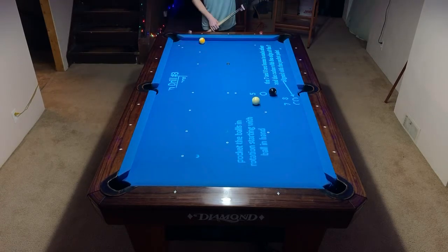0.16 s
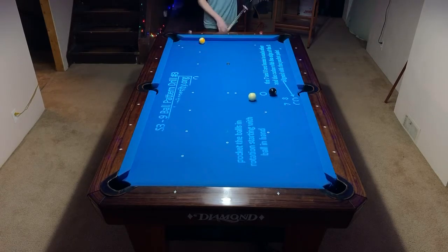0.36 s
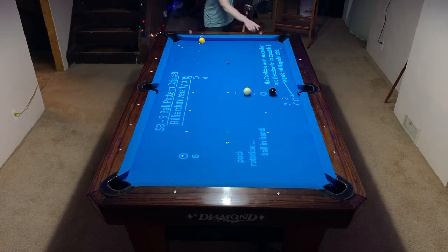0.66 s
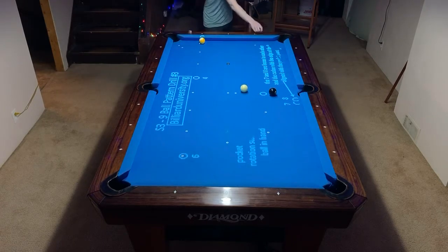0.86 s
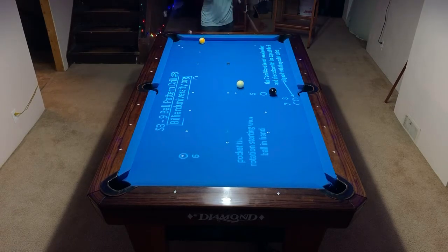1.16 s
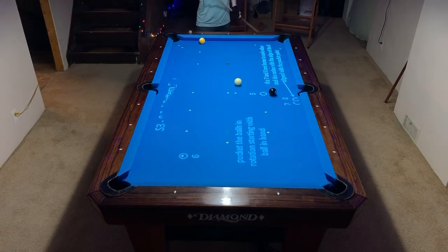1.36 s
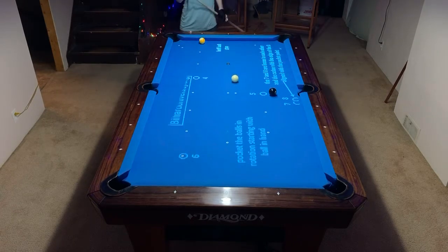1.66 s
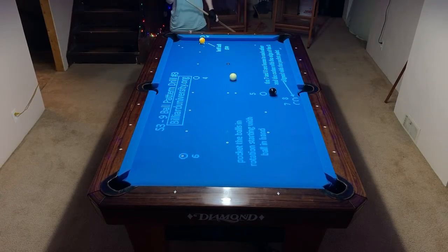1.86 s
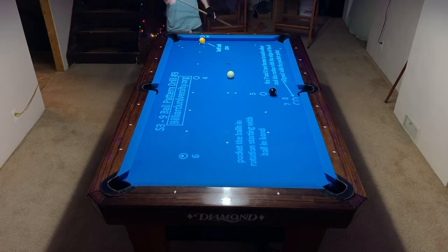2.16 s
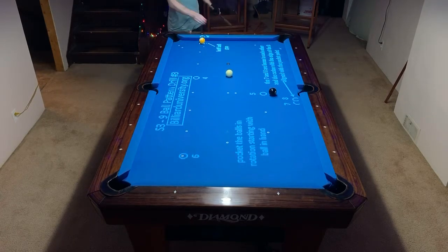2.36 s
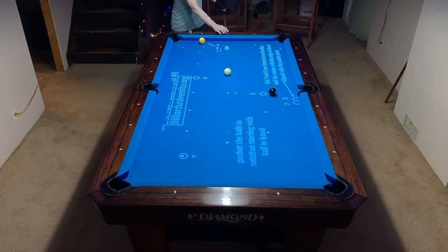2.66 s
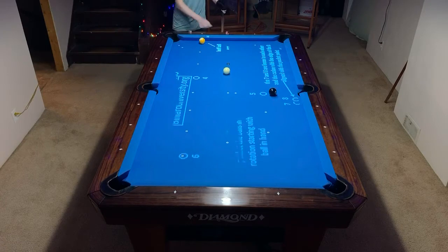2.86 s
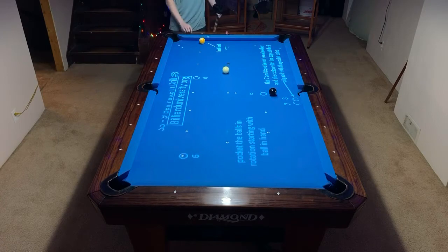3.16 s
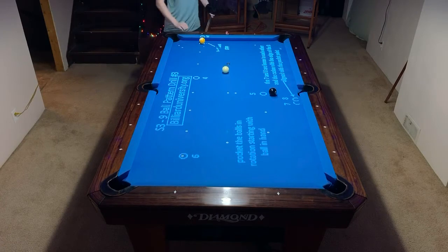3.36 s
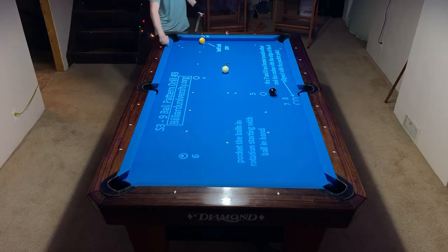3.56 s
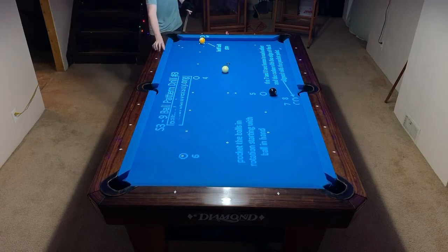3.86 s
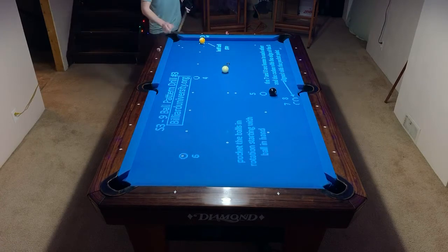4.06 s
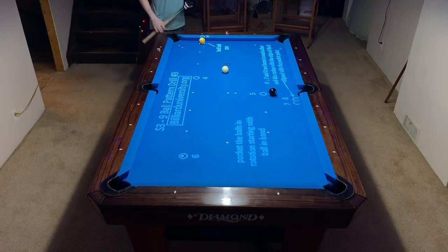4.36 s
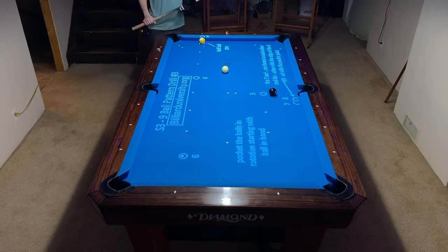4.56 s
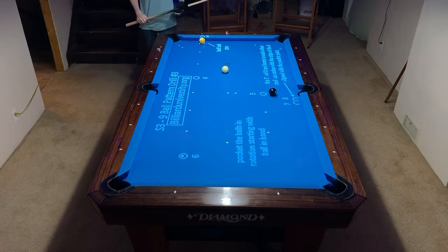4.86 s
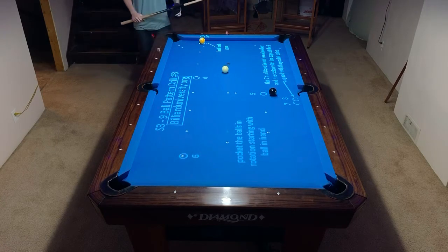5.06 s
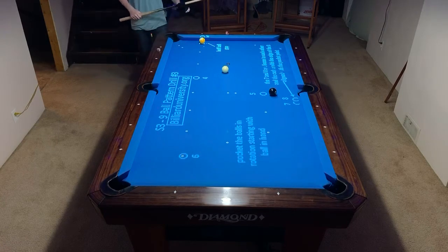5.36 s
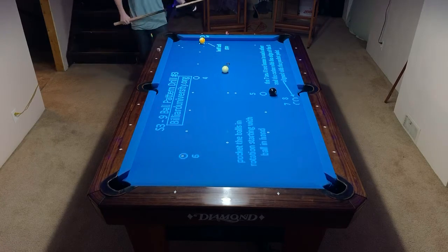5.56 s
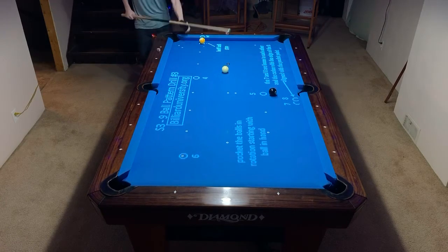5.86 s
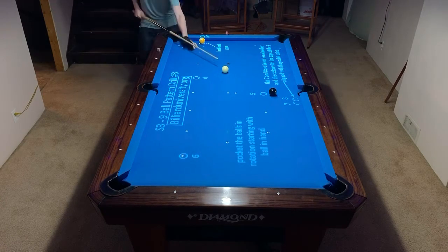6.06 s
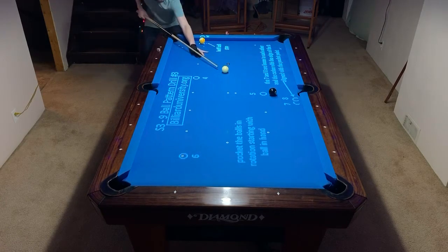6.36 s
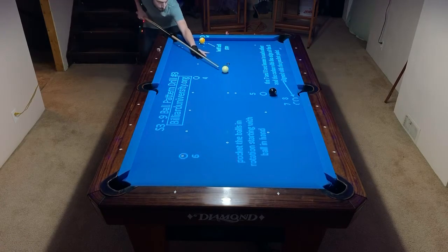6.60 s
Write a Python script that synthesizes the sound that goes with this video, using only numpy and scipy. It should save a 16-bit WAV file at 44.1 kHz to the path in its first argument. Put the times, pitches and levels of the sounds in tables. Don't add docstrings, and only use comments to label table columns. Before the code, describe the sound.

In a quiet basement, balls tumble inside a pool table: sharp clicks, boomy wooden thuds and a short rumble. Then mostly low air and faint fan hum, with light ticks, brief hissy rubbing of cloth and chalk, and isolated bumps. A strong knocking group comes past the middle, and a softer double knock near the end. Heard in stereo from the table's end, with short room reflections.

```python
import sys
import numpy as np
from scipy import signal
from scipy.fft import rfft, irfft, next_fast_len
from scipy.io import wavfile
from scipy.ndimage import uniform_filter1d

SR = 44100
rng = np.random.default_rng(int(sys.argv[2]) if len(sys.argv) > 2 else 0)


def master_out(mix):
    frames = np.transpose(np.atleast_2d(mix))
    ceiling = np.clip(frames, -1, 1)
    pcm = np.round(ceiling * 32767).astype(np.int16)
    wavfile.write(sys.argv[1], SR, pcm)


def boost(x):
    u = np.asarray(x, float) / 20
    return 10 ** u


N = 296793

# (frequency [Hz], width [Hz], level [dB])
BOOM = [(55.9, 15, -3.5), (86.1, 20.2, 0), (115.2, 15.7, 1), (138.7, 20.2, -2.5), (168, 17, -10)]
PANELS = [(185.3, 13, -7.5), (194.1, 15, -9.5), (218.55, 9.3, -2), (239, 16, -12)]
RAILS = [(245.3, 24.4, -1.5), (283.2, 20.6, 1.5), (321, 10, -7)]
# (frequency [Hz], width [Hz], level [dB])
WALLS = [(351.2, 13.6, 2.5), (400, 16.4, 0), (441.5, 35, 0.5), (488.6, 41, 0), (533, 28, 1.5),
         (619.7, 34, -2), (667, 27, -2), (777.5, 88, -5.5), (978, 25, -6.5), (1090, 22, -8.5),
         (1400, 150, -21), (1900, 53, -31.5)]
BODY = (BOOM, PANELS, RAILS, WALLS)


def evened(x):
    return x / np.sqrt(np.mean(x ** 2) + 1e-20)


def read(points, hz):
    f, value = np.transpose(points)
    return np.interp(np.log(hz + 1), np.log(f + 1), value)


def add(mix, s, sound):
    part = mix[:, max(round(s * SR), 0):][:, :sound.shape[1]]
    part += sound[:, :part.shape[1]]


def ring(x, modes):
    out = 0
    for k, (hz, width, db) in enumerate(modes):
        radius = np.exp(-np.pi * width / SR)
        turn = 2 * np.pi * hz / SR
        gain = (-1) ** k * boost(db) * (1 - radius) * np.sin(turn)
        out = out + gain * signal.lfilter([1], [1, -2 * radius * np.cos(turn), radius ** 2], x)
    return out


def steadied(x, share):
    power = abs(uniform_filter1d(x[0] ** 2, size=2200)) + 1e-20
    return evened(x / power ** (share / 2))


def air():
    # (frequency [Hz], density [dB per Hz])
    air_spectrum = [(15, -54), (28, -22), (59, -4), (129, 0), (411, -19), (599, -18), (827, -25),
                    (1050, -21.5), (1380, -28), (2700, -49.5), (5000, -59), (8000, -62), (11300, -59),
                    (15600, -71)]
    # (frequency [Hz], width [Hz], level [dB])
    fan_modes = [(1050, 30, -59.5), (504, 53, -58.5)]
    frames = N // 256 + 5
    hz = np.fft.rfftfreq(1024, 1 / SR)
    real, imaginary, patches = rng.standard_normal((frames, 513, 2, 3)).T
    patches = uniform_filter1d(patches[0], size=10, axis=0)
    patches = evened(uniform_filter1d(patches, size=14, axis=1))
    bins = (real + 1j * imaginary) * boost(read(air_spectrum, hz)[:, None] + 2.5 * patches)
    out = boost(-43) * evened(signal.istft(bins, nperseg=1024, noverlap=768)[1][:, :N])
    for f, width, db in fan_modes:
        out = out + boost(db) * evened(ring(rng.standard_normal((2, N)), [(f, width, 0)]))
    return out


def run_shape(t, start, hold, fall_db):
    rise = np.clip((t - start) / 0.014 + 1, 0, 1)
    return rise * boost(-fall_db * np.maximum(t - start - hold, 0))


def rolling():
    # (start [s], hold [s], cabinet boom level [dB],
    # panels over boom [dB], rails and walls over boom [dB])
    runs = [(0.0, 0.046, -15, -5, -11), (0.044, 0.058, -29, 13.5, -6), (.125, 0.046, -19, -2, -20),
            (0.188, 0.05, -19.5, 6, -15), (0.272, 0.066, -23.5, 6, -13.5), (.345, 0.081, -29, 10, -13.5),
            (0.621, 0.022, -41.5, -16.5, -24.5), (1.157, 0.041, -30.5, -15, -26),
            (1.24, .64, -40.5, -4.5, -5), (1.997, .06, -25.5, -2, -10.5), (2.112, .085, -29, -11.5, -29),
            (3.554, 0.12, -44.5, -3, -11), (3.817, 0.18, -33.5, -13.5, -26), (4.126, 0.15, -41, -5, 0.5),
            (4.301, 0.092, -31.5, 2, 0.5), (4.426, 0.022, -22.5, -3.5, -8.5),
            (4.471, 0.051, -27, 3.5, -7.5), (4.6, .17, -36, -18, -15.5), (4.808, 0.079, -40.5, -15, -14),
            (5.672, 0.054, -30, -16.5, -16.5), (6.179, .03, -32.5, -0.5, 7), (6.246, .03, -26.5, -0.5, -5),
            (6.303, 0.028, -31.5, -7.5, -5.5), (6.653, 0.023, -37, -1, -10)]
    # (cabinet, panels, rails, walls [dB/s])
    falls = (190, 240, 200, 250)
    # (cabinet, panels, rails, walls [dB])
    tremor = (-47.5, -52.5, -56, -60)
    # (frequency [Hz], width [Hz], level under boom [dB])
    grille = (11000, 350, -62)
    walls_under_rails_db, jolts_per_s = -4, 120
    t = np.arange(N) / SR
    jolts = boost(2.5 * np.minimum(rng.exponential(1, N), 3)) * (rng.random(N) < jolts_per_s / SR)
    unevenness = evened(uniform_filter1d(jolts, size=200))
    shake = rng.standard_normal((2, N)) * (1 + 1.2 * unevenness)

    slow = t[::32]
    power = boost(np.array(tremor))[:, None] ** 2 * np.ones(len(slow))
    for s, hold, db, panels_db, upper_db in runs:
        over_boom = np.array([0, panels_db, upper_db, upper_db + walls_under_rails_db])
        shape = run_shape(slow, s, hold, np.array(falls)[:, None])
        power += (boost(db + over_boom)[:, None] * shape) ** 2
    levels = [np.interp(t, slow, uniform_filter1d(np.sqrt(p), size=9)) for p in power]

    out = levels[0] * boost(grille[2]) * evened(ring(ring(shake, [grille]), [grille]))
    for modes, level in zip(BODY, levels):
        out += level * steadied(ring(ring(shake, modes), modes), 0.95)
    return out


def contacts():
    # (time [s], level [dB], pitch [Hz], t60 [s], ring over click [dB])
    knocks = [(.002, -19.5, 2080, 0.4, -4.5), (.851, -64.5, 5100, .11, -14), (.997, -51.5, 630, 0.21, -10),
              (1.142, -52, 1175, 0.62, -3), (1.749, -51.5, 2024, 1, -15), (1.971, -33.5, 702, 0.35, -10),
              (2.851, -69, 2500, .21, -3), (3.787, -65.5, 7050, .13, 2), (3.900, -49, 624, 0.58, -7.5),
              (4.109, -45, 802, 0.92, 2), (4.285, -29, 798, 0.41, 0.5), (4.423, -44, 1050, .99, -9),
              (4.964, -53.5, 738, .51, 0), (5.670, -47.5, 543, 0.29, 2.5), (6.171, -36, 549, 0.48, 6),
              (6.229, -38, 744, .44, 4.5), (6.632, -46.5, 1140, 0.6, -6.5)]
    # (time [s], level [dB], ring [Hz], t60 [s])
    ticks = [
        (1.380, -64, 4430, 0.46),
        (1.783, -47, 4700, 1),
        (2.579, -44, 3570, .45),
        (4.292, -52, 3820, .64),
        (4.608, -51.5, 3510, 0.42),
    ]
    # (time [s], level [dB], contact pitch
    # [Hz], board or ring [Hz], ring over click [dB])
    clacks = [
        (.003, -33, 7510, 12500, 1),
        (.006, -29.5, 1400, 1090, 6),
        (.041, -36.5, 1780, 1050, -1),
        (.135, -27.5, 2360, 1010, -5.5),
        (.137, -43, 6000, 4100, -5),
        (0.194, -29, 1495, 1900, -11.5),
        (.27, -35.5, 2010, 800, -4),
        (2.578, -36.5, 2320, 1404, 1),
        (4.471, -50, 1520, 1050, 9),
    ]
    sharp = [(s, db, hz, t60, hz, ring_db) for s, db, hz, t60, ring_db in knocks]
    sharp += [(s, db, 0.66 * hz, t60, hz, -4.5) for s, db, hz, t60 in ticks]
    sharp += [(s, db, hz, 0.47, board_hz, board_db) for s, db, hz, board_hz, board_db in clacks]
    return sorted(sharp)


def clicks():
    # (frequency [Hz], factor on t60 [1])
    room_decay = [(200, 1.3), (1000, 0.89), (3000, 0.73), (8000, 0.5)]
    out, length = np.zeros((2, N)), SR // 2
    for s, db, contact_hz, t60, mode_hz, mode_db in contacts():
        taps = rng.choice([-1., 1.], (2, length)) * (rng.random((2, length)) < 3000 / SR)
        taps[:, 128] = 1.0
        taps[:, :128] = 0
        hz, t, bins = signal.stft(taps, SR, nperseg=128)
        ratio = (hz[:, None] + 1) / contact_hz
        colour = ratio / (1 + ratio ** 2) ** 1.795 / np.sqrt(1 + (ratio / 2.64) ** 6)
        swell = 1 - 0.41 * np.exp(-t / 0.013)
        fade = swell * boost(-60 * t / (t60 * read(room_decay, hz)[:, None]))
        answer = signal.istft(bins * colour * fade, SR, nperseg=128)[1][:, 100:]
        early = answer * boost(-60 * np.arange(answer.shape[1]) / SR / (0.37 * t60))
        tone = ring(early, [(mode_hz, 0.12 * mode_hz, 0)])
        add(out, s, boost(db) * answer / abs(answer).max())
        add(out, s, boost(db + mode_db) * tone / abs(tone).max())
    return out


def ports(x):
    # (frequency [Hz], gain [dB])
    housing = [(300, 16.5), (3000, 1), (7000, 5.5), (9000, 7.5), (11000, -1.5), (15000, -1)]
    size = next_fast_len(N + SR // 10)
    spectrum = rfft(np.pad(x, ((0, 0), (0, size - N)), "reflect"))
    return irfft(spectrum * boost(read(housing, np.fft.rfftfreq(size, 1 / SR))), size)[:, :N]


def bumps():
    # (time [s], level [dB], panels over boom [dB],
    # walls over boom [dB], t60 [s])
    blows = [(0.004, -9.5, 2.5, -11.5, 0.65), (0.136, -7.5, -4, -5, 0.35), (1.172, -24.5, -0.5, -7, 0.17),
             (1.985, -9.5, 2, -16.5, 0.17), (2.112, -18, 2.5, -9, 0.5), (3.812, -43.5, -7, -7, 0.36),
             (4.109, -17.5, -8, -8, 1), (4.294, -5.5, 2, -5, 0.26), (4.421, -13, -5.5, -3.5, 0.27),
             (4.472, -16.5, 2, -15, 0.65), (4.962, -22.5, -1.5, -6, 0.24), (5.672, -28, -6, -4, 0.33),
             (6.177, -14.5, -10, 3.5, 0.29), (6.226, -13.5, -7, -5.5, 0.34)]
    rails_over_boom_db = -4.5
    out, t = np.zeros((2, N)), np.arange(SR // 2) / SR
    dull = signal.butter(2, 1100, fs=SR)
    for s, db, panels_db, walls_db, t60 in blows:
        envelope = boost(-60 * t / t60) + 2.6 * np.exp(-t / 0.0023)
        rattle = signal.lfilter(*dull, rng.standard_normal((2, len(t))) * envelope)
        for modes, part_db in zip(BODY, (0, panels_db, rails_over_boom_db, walls_db)):
            rung = ring(rattle, modes)
            add(out, s, boost(db + part_db - 10) * rung / abs(rung).max())
    return out


def swells(table, ragged_db, steady, peaked):
    out = np.zeros((2, N))
    for s, length, db, hz, width in table:
        count = int(length * SR)
        mode = [(hz, width, 0)]
        hiss = ring(ring(rng.standard_normal((2, SR)), mode), mode)
        hiss = steadied(hiss, steady)[:, SR - count:]
        wander = evened(uniform_filter1d(rng.standard_normal(SR), size=500))
        ragged = boost(ragged_db * wander)[:count]
        add(out, s, boost(db) * evened(hiss) * ragged * np.hanning(count) ** peaked)
    return out


def singing_boards():
    # (time [s], length [s], level [dB], centre [Hz], width [Hz])
    songs = [(0.01, 0.0501, -16, 206.7, 11), (0.01, 0.041, -24, 672.2, 14), (0.15, .05, -30, 673, 25),
             (0.19, 0.061, -29.5, 533, 22), (1.3, 0.46, -41, 176, 33), (3.79, 0.4, -36.5, 122, 6.8),
             (4.09, .19, -42, 608, 31), (4.1, 0.22, -42, 399, 9), (4.29, .1, -26, 400, 34),
             (4.41, 0.067, -27, 400, 14), (4.44, .17, -30.5, 221.3, 32), (4.49, .1, -49.5, 1050, 33),
             (5.665, .09, -32.5, 99, 17), (5.668, .04, -45, 567, 40), (6.166, .12, -27, 336, 55),
             (6.24, .17, -35.5, 330, 46), (6.25, 0.092, -28, 129.6, 15), (6.63, 0.097, -48.5, 1590, 870),
             (6.635, 0.084, -62, 2100, 390)]
    return swells(songs, ragged_db=0.3, steady=0.8, peaked=0.4)


def rubbing():
    # (time [s], length [s], level [dB], centre [Hz], width [Hz])
    strokes = [(1.12, 0.42, -68.5, 1852, 1610), (1.7, .45, -78, 10920, 3040), (1.79, 0.36, -64, 3010, 2500),
               (2.065, .17, -64.5, 7100, 3150), (2.07, 0.17, -63, 3340, 4380),
               (2.115, 0.072, -60.5, 7400, 2500), (3.035, 0.16, -76, 7140, 2300),
               (3.05, 0.13, -68, 10300, 2000), (3.06, .12, -78, 14950, 3060), (3.19, .1, -74, 7300, 2700),
               (3.195, 0.089, -78.5, 12200, 5000), (3.62, 0.089, -74.5, 8800, 9000),
               (4.29, 0.25, -66, 2210, 2490), (6.1, 0.67, -81, 9550, 2700), (6.16, 0.39, -75, 2960, 2700),
               (6.63, .2, -83.5, 10600, 4000)]
    return swells(strokes, ragged_db=2.3, steady=0.1, peaked=0.72)


def scene():
    table_body = rolling() + bumps() + singing_boards()
    return air() + table_body + ports(clicks()) + rubbing()


def roll_off(x):
    return signal.sosfilt(signal.butter(12, 15710, fs=SR, output="sos"), x)


def record(dry):
    # (frequency [Hz], likeness [1])
    likeness = [(60, 0.92), (130, 1), (290, 0.61), (640, 0.55), (1400, 0.5), (3000, 0.11), (6000, 0.47),
                (8600, 0.73), (11000, 0.64), (14000, .9)]
    # (frequency [Hz], lead [rad])
    phase_lead = [(0, 0), (150, .2), (500, 1.4), (1120, 1.3), (2240, 7.3), (4130, 11.9), (6400, 18.7),
                  (8600, 15.7), (11000, 12.6), (13500, 9.4), (16000, 6.3)]
    # (frequency [Hz], difference [dB])
    balance = [(60, -3), (110, 0), (200, -1.5), (380, 0), (700, 0), (1290, 0.5), (2380, 0.0), (4400, -1.5),
               (8120, -2), (15000, 5)]
    margin = SR // 10
    size = next_fast_len(N + 2 * margin)
    hz = np.fft.rfftfreq(size, 1 / SR)
    padded = np.pad(dry, ((0, 0), (margin, margin)), "reflect")
    first, second = rfft(padded, size) / np.sqrt(1 + (36 / (hz + 1)) ** 6)
    same = np.clip(read(likeness, hz), 0, 1)
    delayed = first * np.exp(-1j * np.interp(hz, *np.transpose(phase_lead)))
    right = same * delayed + np.sqrt(1 - same ** 2) * second
    lean = boost(read(balance, hz) / 2)
    pair = irfft(np.array([first * lean, right / lean]), size)[:, margin:margin + N]
    pair *= np.minimum((N - 1 - np.arange(N)) / 150, 1)
    return roll_off(pair)


dry = scene()
out = record(dry)
master_out(out)
```